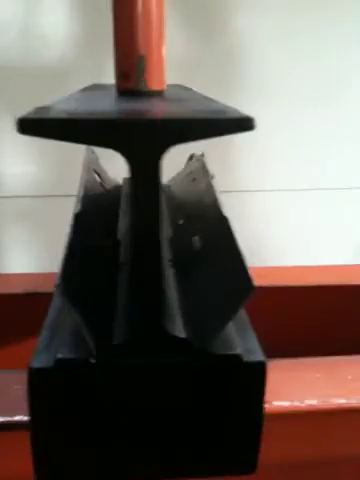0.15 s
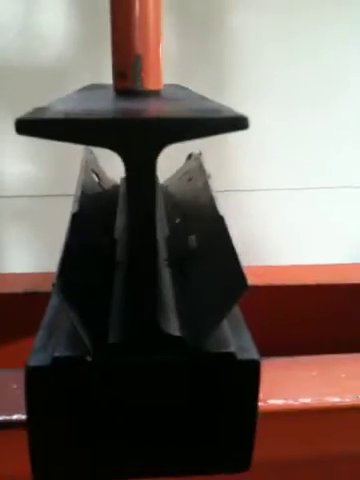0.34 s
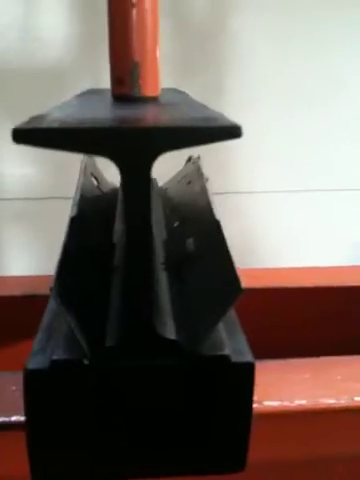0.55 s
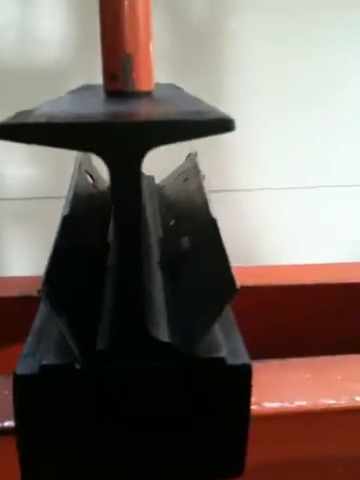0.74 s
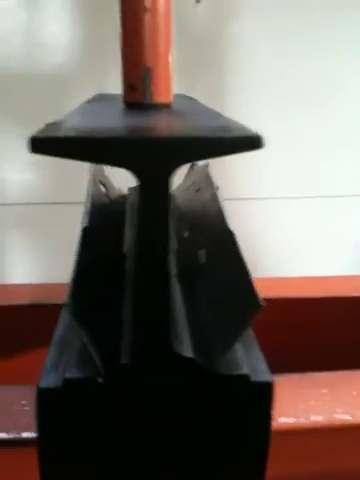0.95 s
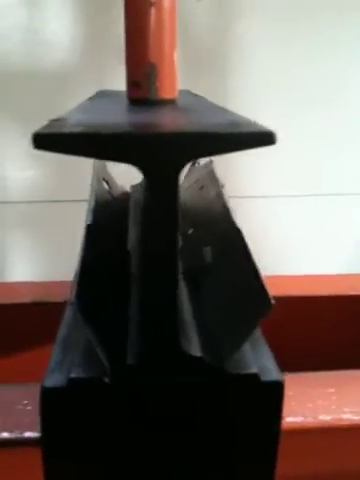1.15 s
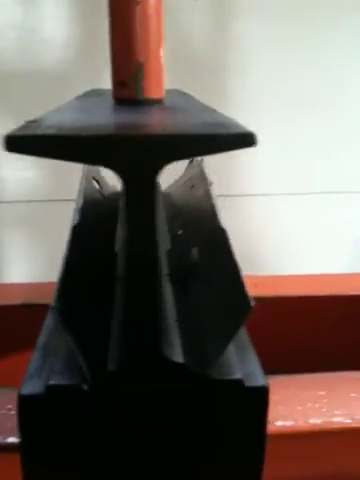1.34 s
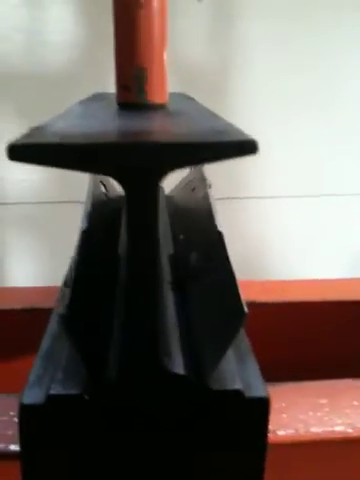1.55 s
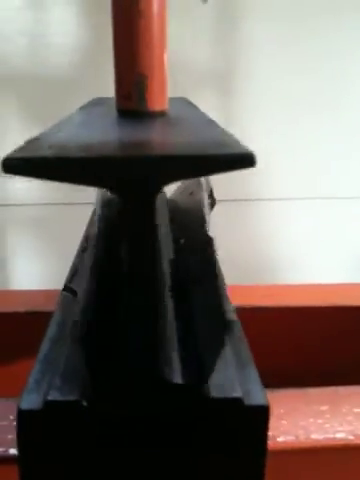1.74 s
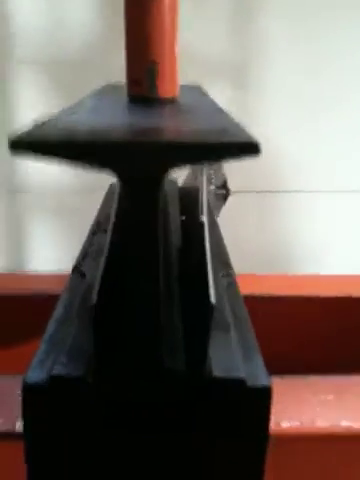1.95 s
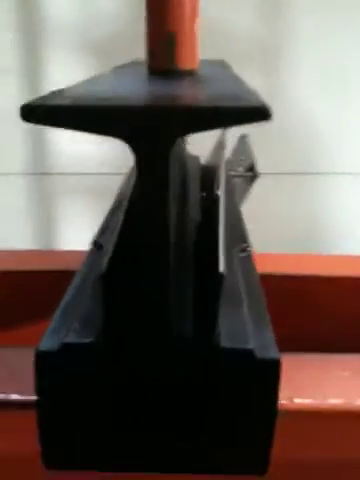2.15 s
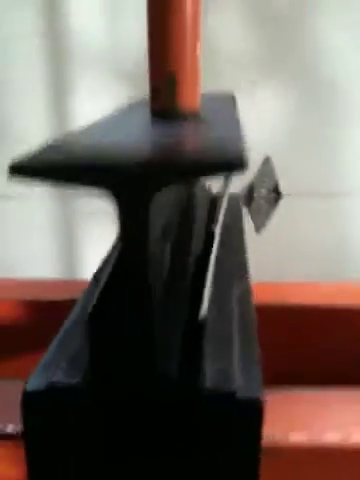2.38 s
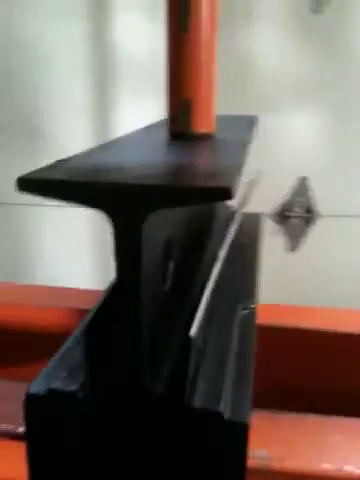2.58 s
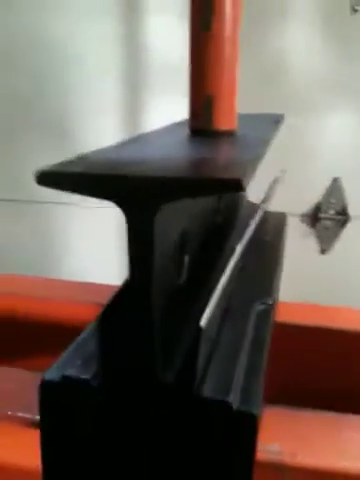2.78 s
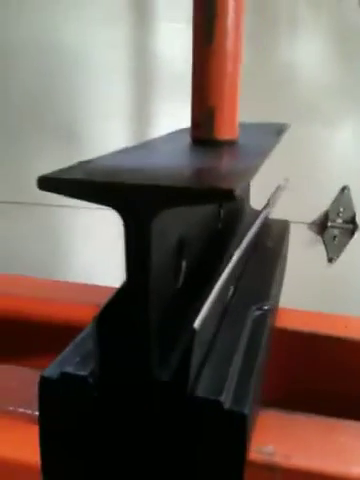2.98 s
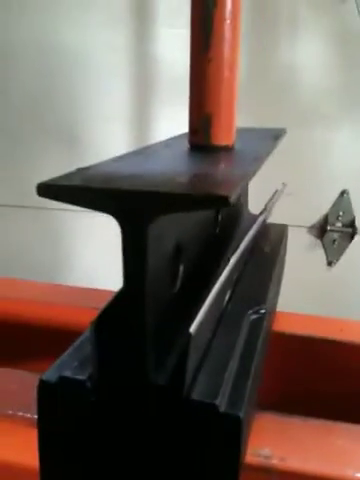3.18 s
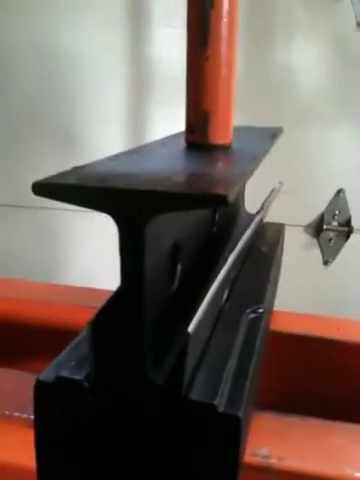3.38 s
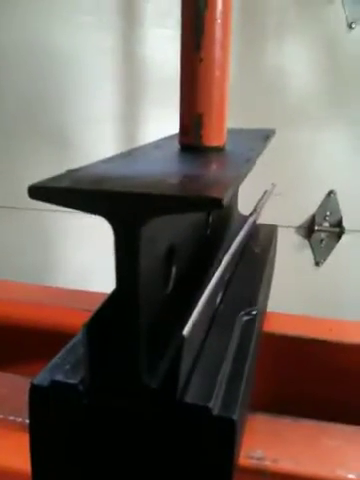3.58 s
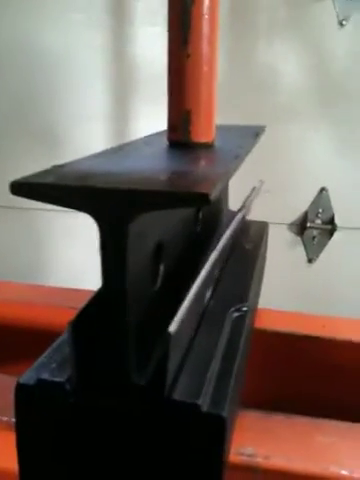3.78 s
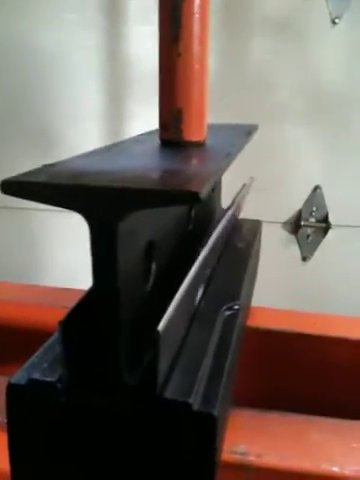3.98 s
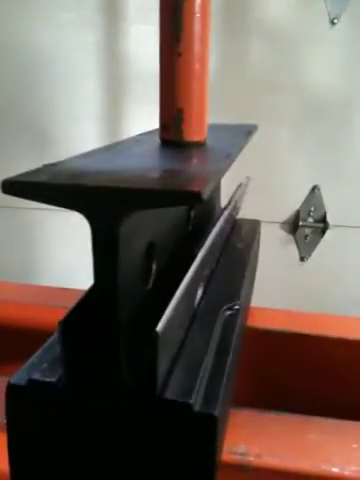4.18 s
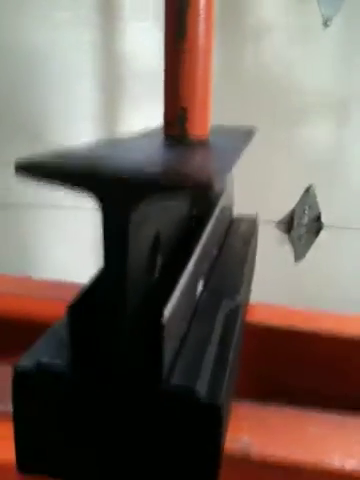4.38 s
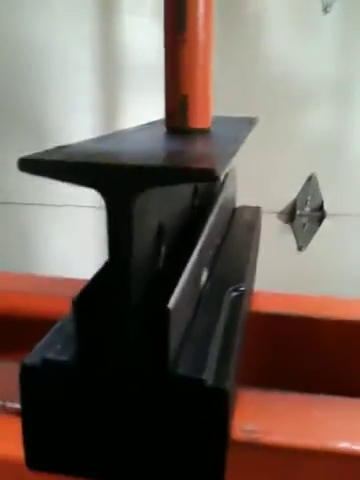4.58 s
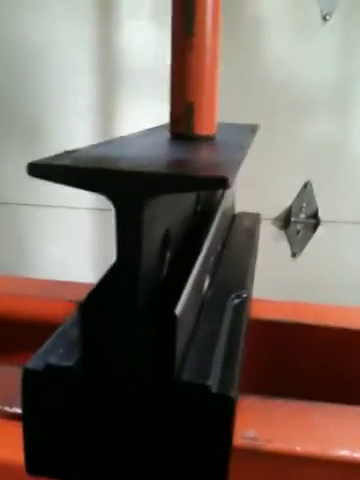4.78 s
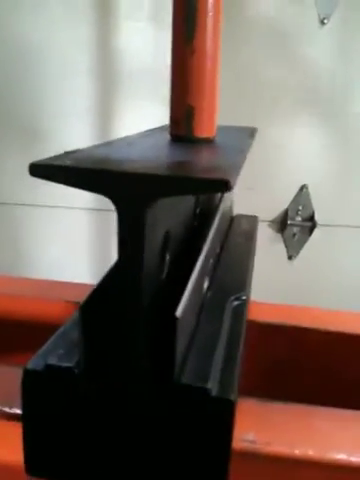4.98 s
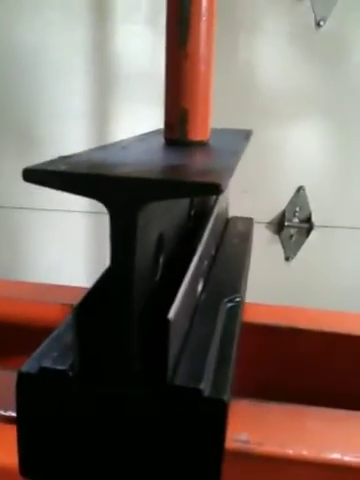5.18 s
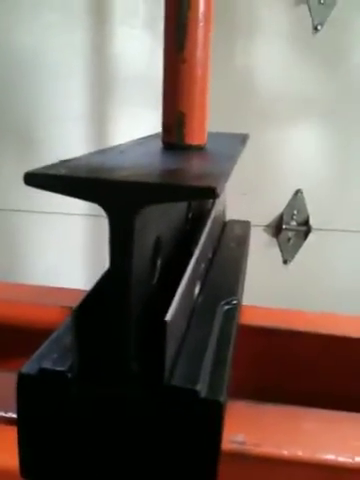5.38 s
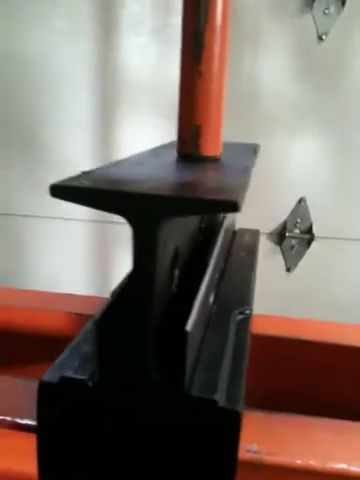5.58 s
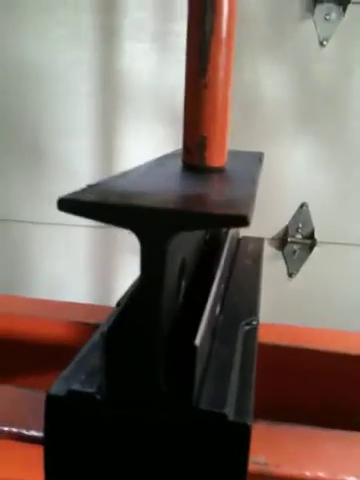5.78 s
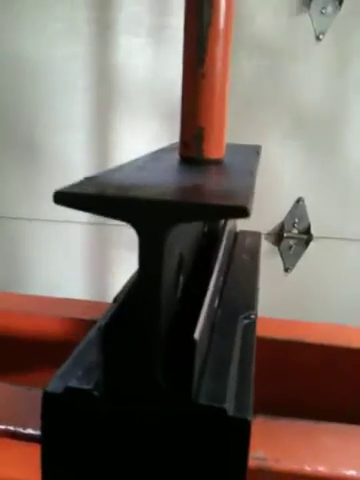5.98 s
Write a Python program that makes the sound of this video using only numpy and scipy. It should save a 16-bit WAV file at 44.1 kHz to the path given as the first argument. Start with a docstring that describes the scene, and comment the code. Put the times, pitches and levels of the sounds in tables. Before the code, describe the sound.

A hydraulic press folds sheet steel with faint metallic creaks and two loud ringing bangs over a low pump hum.

```python
"""Faint, even creaks sound over the low hum of a pump and the soft hiss of a workshop.
A hydraulic press is driving a steel beam into a die (a shaped block), folding a sheet between them.
The sheet sticks and slips with creaks and hollow knocks, and ticks as edges crack and scale flakes off.
Twice it snaps through with a bang that overloads the microphone and leaves the steel ringing."""
import sys
import numpy as np
from scipy import signal
from scipy.fft import rfft, irfft, next_fast_len
from scipy.io import wavfile

SR = 44100
rng = np.random.default_rng(int(sys.argv[2]) if len(sys.argv) > 2 else 0)


def unload_audio(sound):
    """Save the sound as a 16-bit wav file, at the path given as the first command line argument."""
    columns = np.transpose(np.atleast_2d(sound))
    # keep every value between -1 and 1, then stretch to whole-number steps
    steps = np.round(np.clip(columns, -1, 1) * 32767)
    wavfile.write(sys.argv[1], SR, steps.astype(np.int16))


N = 265905
TIME = np.arange(N) / SR
ONE_SECOND = TIME[:SR]

# The pump's hum. Each row: pitch in Hz, average (rms) level in dB.
PUMP_TONES = [(192.3, -64.5), (115, -87), (291, -81)]
# The workshop's rumble and hiss. Each row: frequency in Hz, relative level in dB.
AIR_SPECTRUM = [(30, -39.5), (70, -21), (120, -6), (170, 3), (330, -2), (500, -5.5), (700, -11),
                (1400, -11.5), (2000, -17), (2400, -20.5), (2800, -16.5), (4000, -21.5), (8000, -19),
                (16000, -24)]
# Runs of slips over the die edge. Each row: start and latest time in seconds, first gap in seconds,
# level in dB, loss per slip in dB, change for every second slip in dB, low cut in Hz, brightness in Hz.
# Brightness is the frequency above which a sound is muffled.
SLIP_RUNS = [(-0.040, 1.07, 0.1750, -58.5, 1.5, 7, 730, 1586),
             (4.608, 5.78, 0.1850, -37.5, 1.13, -1, 1440, 2320)]
# The blur of many tones in beam and die, drawn out by the workshop. Each row: frequency in Hz,
# relative level in dB, ring time in seconds. Ring time (t60) is how long a sound takes to fall 60 dB.
PRESS_BLUR = [(60, -40, 0.49), (120, -26.5, .4), (220, -15.5, 0.36), (358, -10.5, 0.67), (575, -12.5, 0.37),
              (760, 0.5, 0.26), (1010, -3.5, .5), (1510, 3.5, 0.37), (2080, -4.5, 0.44), (3370, -1, 0.32),
              (5400, -7.5, 0.34), (8500, -3.5, 0.23), (11100, -10.5, 0.25), (16100, -17.5, 0.16)]
# The die edge where the sheet rubs. Each row: pitch in Hz, relative level in dB, ring time in seconds.
EDGE_TONES = [(913, -5.5, .3), (1090, -8, 0.44), (1290, -17.5, .35), (1520, -11.5, 0.69), (1735, -16, 0.17),
              (1866, -0.5, 0.046), (3070, -6, 0.14), (3700, -47, 0.46)]
# Long tones of the sheet's free wings, clamped differently by each fold. Each row: pitch in Hz,
# then level in dB and ring time in seconds for the first bang, then the same two for the second.
SHEET_TONES = [(286.0, -57, 4.1, -60, 5.2), (310.4, -55, 1.4, -47, 1.3), (355.8, -53, 2.8, -57, 4.6),
               (424.4, -74, 12.0, -55, 5.2), (561.2, -77, 12.0, -68, 7.7), (593.7, -72, 1.9, -34, 1.5),
               (627.3, -72, 5.2, -49, 7.7), (695.0, -60, 3.1, -48, 6.0), (755.5, -63, 12.0, -43, 8.7),
               (797.7, -68, 2.6, -55, 6.0), (875.8, -58, 4.6, -50, 7.2), (934.0, -66, 5.6, -54, 12.0),
               (970.3, -50, 1.2, -33, 2.6), (995.1, -54, 3.8, -50, 8.2), (1043.2, -59, 5.2, -40, 3.6),
               (1071.3, -67, 7.2, -52, 6.3), (1095.2, -48, 2.8, -46, 7.2), (1141.9, -52, 4.3, -34, 4.3),
               (1188.7, -44, 2.3, -28, 2.6), (1227.6, -48, 4.6, -36, 3.0), (1291.0, -39, 3.1, -40, 4.3),
               (1333.7, -37, 2.3, -44, 5.6), (1371.4, -48, 4.1, -31, 2.8), (1422.5, -54, 4.9, -48, 3.1),
               (1446.4, -57, 6.0, -56, 8.2), (1499.9, -52, 4.9, -41, 8.7), (1551.6, -43, 3.6, -34, 2.4),
               (1600.5, -48, 1.9, -50, 4.9), (1649.1, -71, 12.0, -50, 12.0), (1705.8, -62, 4.6, -54, 3.8)]
# The sheet lurches in the die. Each row: start in seconds, creak level in dB, brightness in Hz.
LURCHES = [(0.218, -68.5, 2415), (0.402, -47, 4530), (2.243, -45.5, 8100), (2.276, -51.5, 4400),
           (2.532, -61, 4410), (2.763, -55.5, 5650), (2.851, -55, 4400), (5.566, -45.5, 5750)]
# The hollow of the die. Each row: pitch in Hz, relative level in dB, ring time in seconds.
HOLLOW_TONES = [(640, -9.5, 0.27), (730.7, 3, 0.37), (880, -17, 0.27)]
# Edges crack. Each row: start in seconds, relative peak level in dB, pitch in Hz.
EDGE_CRACKS = [(0.372, -34.5, 2800), (2.148, -39, 6600), (2.198, -35.5, 7060), (2.835, -28, 7560),
               (2.853, -33, 7170), (4.867, -28, 6260), (5.55, -30.5, 6960), (5.581, -20.5, 4300),
               (5.593, -25, 3080)]
# Scale flakes off the bend. Each row: start and end in seconds, typical relative peak level in dB.
FLAKING_SPELLS = [(1.30, 1.54, -62.5), (2.22, 2.351, -46.5), (3.76, 4.018, -49.5), (4.93, 5.055, -41.5)]
# The sheet snaps through and strikes the die. Each row: start in seconds, strength in dB,
# brightness in Hz, thud strength in dB, level of the sheet's weak tones in dB.
SNAPS = [(1.8487, -8, 4567, -4.5, -38.5), (4.3400, 2, 12070, -10.5, -30.5)]
# Short tones of the clamped beam and die. Each row: pitch in Hz, relative level in dB, ring time in seconds.
PRESS_TONES = [(640, -20, .3), (722, -10, .33), (796, -14, .34), (1085, -18, .3), (1153, -15, .5),
               (1237, -14, .58), (1304, -15, .55), (1519, -12, .3), (2114, -9, .34), (2246, -18, .3),
               (2430, -18, .36), (2910, -23, .35), (3311, -20, .35), (3440, -21, .37), (7326, -14, .3),
               (7872, -20, .3), (8776, -20, .28), (8960, -17, .25), (9459, -22, .3), (12945, -24, .18)]
# The settling sheet hits the die again. Each row: start in seconds, strength in dB, brightness in Hz.
REBOUNDS = [(1.876, -19, 7026), (4.361, -16, 5036), (4.396, -9, 7000), (4.432, -38, 5710)]
# Weak tones between the sheet's main ones. Each row: frequency in Hz, relative level in dB
# at the first bang, then at the second.
WEAK_SHEET_SPECTRUM = [(716, -17.5, -4.5), (890, -26.5, -20), (1110, -9, -13), (1380, 3.5, 3),
                       (1420, -7.5, -13.5), (1570, -4, 1.5), (1599, -21.5, -17.5)]


def from_db(db):
    """Turn decibels into a gain to multiply by."""
    return 10 ** (np.asarray(db) / 20)


def unit_rms(x):
    """Scale a sound to an average (rms) level of 1."""
    return x / np.sqrt(np.mean(x ** 2) + 1e-20)


def look_up(table, hz, column=1):
    """Read between the rows of a table, on a musical (log) frequency scale."""
    table = np.array(table)
    return np.interp(np.log(np.maximum(hz, 1)), np.log(table[:, 0]), table[:, column])


def keep_side(x, hz, side, order=2):
    """Keep the "low" or "high" side of hz; a higher order cuts more steeply."""
    return signal.sosfilt(signal.butter(order, min(hz, .45 * SR), side, fs=SR, output="sos"), x)


def fade(t, t60):
    """Die away, 60 dB down after t60 seconds."""
    return np.exp(-np.log(1000) * t / t60)


def tone(hz, t60):
    """One second of a dying tone: one way the steel can vibrate."""
    return np.sin(2 * np.pi * hz * ONE_SECOND + rng.uniform(0, 2 * np.pi)) * fade(ONE_SECOND, t60)


def ring(table):
    """All the tones of a struck part, sounding together."""
    return sum(from_db(db) * tone(hz, t60) for hz, db, t60 in table)


def add(out, start_s, sound):
    """Mix a sound in at its start time."""
    first = round(start_s * SR)
    heard = sound[max(-first, 0):N - first]
    out[max(first, 0):max(first, 0) + len(heard)] += heard


def pump():
    """The pump hums, low and steady."""
    return sum(np.sqrt(2) * from_db(db) * np.sin(2 * np.pi * hz * TIME) for hz, db in PUMP_TONES)


def workshop_air(level_db=-67.5):
    """The workshop rumbles and hisses softly."""
    size = next_fast_len(N)
    colour = from_db(look_up(AIR_SPECTRUM, np.fft.rfftfreq(size, 1 / SR)))
    noise = irfft(rfft(rng.standard_normal(size)) * colour, size)[:N]
    return from_db(level_db) * unit_rms(noise)


def slip_beat(max_slips=8, gap_shrink=0.013, slip_s=0.0095):
    """Pushed steadily, the sheet sticks and slips in a beat that fades as it gives; list the creaks."""
    rows = []
    for start, end, gap, db, loss_db, accent_db, low_hz, bright_hz in SLIP_RUNS:
        for k in range(max_slips):
            if start < end:
                rows.append((start, db - loss_db * k + accent_db * (k % 2), low_hz, bright_hz, slip_s))
            start += gap * (1 - gap_shrink) ** k
    return rows


def press_blur():
    """Countless tones of beam and die blur into bands of noise, each dying at its own pace."""
    hz = np.fft.rfftfreq(SR, 1 / SR)
    spectrum = from_db(look_up(PRESS_BLUR, hz)) * np.exp(2j * np.pi * rng.random(len(hz)))
    edges_hz = np.geomspace(70, 17000, 20)
    blur = np.zeros(SR)
    for low, high in zip(edges_hz, edges_hz[1:]):
        band = irfft(spectrum * (hz >= low) * (hz < high))
        t60 = look_up(PRESS_BLUR, np.sqrt(low * high), column=2)
        blur += band * fade(ONE_SECOND, t60)
    return blur / np.std(irfft(spectrum))


def creaks(slips_per_s=1500, damping_t60=3.1, lurch_low_hz=520, lurch_s=0.0074):
    """Each creak is a dying burst of tiny slips that shakes the press and rings the die edge."""
    out, t = np.zeros(N), TIME[:SR // 10]
    bodies = [press_blur() * fade(ONE_SECOND, damping_t60) + ring(EDGE_TONES) for _ in range(2)]
    lurches = [(start, db, lurch_low_hz, bright_hz, lurch_s) for start, db, bright_hz in LURCHES]
    for k, (start, db, low_hz, bright_hz, decay_s) in enumerate(lurches + slip_beat()):
        slipping = rng.random(len(t)) < slips_per_s / SR
        slips = slipping * rng.standard_normal(len(t)) * np.exp(-t / decay_s)
        slips[0] += 1   # the contact breaks loose
        shaken = signal.fftconvolve(slips, bodies[k % 2][:SR // 2])
        creak = keep_side(keep_side(shaken, low_hz, "high"), bright_hz, "low", order=3)
        add(out, start, from_db(db) * creak / np.std(creak[:SR // 25]))   # level of the first 40 ms
    return out


def strain_ring(creaking, gain_db=-22, t60=1.5):
    """The creaks keep the sheet's strongest tones ringing faintly."""
    tones = sum(tone(hz, t60) for hz, db, *_ in SHEET_TONES if db > -45)
    return from_db(gain_db) * signal.fftconvolve(creaking, tones / np.linalg.norm(tones))[:N]


def hollow_knocks(rise_s=0.00061, boost_db=3.5, db_per_octave=-6.5, reference_hz=4500):
    """Each lurch is a soft blow on the hollow die; the duller its creak, the more goes into the knock."""
    out = np.zeros(N)
    attack = 1 - np.exp(-ONE_SECOND / rise_s)
    for start, db, bright_hz in LURCHES:
        knock_db = db + boost_db + db_per_octave * np.log2(bright_hz / reference_hz)
        add(out, start, from_db(knock_db) * ring(HOLLOW_TONES) * attack)
    return out


def ticks(crack_t60=0.017, ping_width_hz=700, ping_db=9, room_db=-1.5, room_t60=0.3, gain_db=-1):
    """Each brief crack pings a small, stiff patch of steel and echoes in the workshop."""
    out, t = np.zeros(N), TIME[:SR // 10]
    for start, db, hz in EDGE_CRACKS + flakes():
        crack = keep_side(rng.standard_normal(len(t)) * fade(t, crack_t60), 2000, "high")
        ping = signal.lfilter(*signal.iirpeak(hz, hz / ping_width_hz, fs=SR), crack)
        tick = keep_side(crack + from_db(ping_db) * ping, 6600, "low")
        add(out, start, from_db(db + gain_db) * tick / np.abs(tick).max())
    echoes = keep_side(rng.standard_normal(SR) * fade(ONE_SECOND, room_t60), 13700, "low")
    return out + from_db(room_db) * signal.fftconvolve(out, echoes / np.linalg.norm(echoes))[:N]


def flakes(per_spell=4, pitch_hz=8500, spread_octaves=0.063, spread_db=4):
    """Scale, the crust on the steel, flakes off the bend; list its faint, scattered ticks."""
    rows = []
    for start, end, db in FLAKING_SPELLS:
        for k in range(per_spell):
            when = start + (end - start) * (k + rng.random()) / per_spell
            flake_db = db + spread_db * rng.normal()
            hz = pitch_hz * 2 ** (spread_octaves * rng.normal())
            rows.append((when, flake_db, hz))
    return rows


def press_blow(bright_hz, tones_db=-0.5):
    """Struck once, beam and die give a few clear tones over the blur."""
    struck = press_blur() + from_db(tones_db) * ring(PRESS_TONES)
    return keep_side(struck, bright_hz, "low", order=1)


def bangs(rise_s=.0015, thud_t60=0.12, boom_hz=716, boom_db=-5, boom_t60=.19):
    """Each snap slams the press, with a heavy thud and a boom of the die; lighter hits follow."""
    out = np.zeros(N)
    attack = 1 - np.exp(-ONE_SECOND / rise_s)
    for start, db, bright_hz, thud_db, _ in SNAPS:
        noise = keep_side(rng.standard_normal(SR), 600, "high")
        thud = keep_side(noise, 1500, "low", order=3) * fade(ONE_SECOND, thud_t60)
        thud /= np.std(thud[:SR // 100])
        boom = from_db(boom_db) * tone(boom_hz, boom_t60)
        bang = from_db(db) * press_blow(bright_hz) + from_db(thud_db) * (thud + boom)
        add(out, start, attack * bang)
    for start, db, bright_hz in REBOUNDS:
        add(out, start, from_db(db) * attack * press_blow(bright_hz))
    return out


def sheet_ring(split_hz=2.9, twin_db=-11, weak_count=28, weak_t60=3):
    """The sheet rings for seconds; its two nearly equal wings make each main tone waver."""
    out = np.zeros(N)
    twin_gain = from_db(twin_db)
    for k, (start, *_, weak_db) in enumerate(SNAPS):
        t = TIME[:N - round(start * SR)]
        sine = lambda hz: np.sin(2 * np.pi * hz * t + rng.uniform(0, 2 * np.pi))
        for hz, *folds in SHEET_TONES:
            db, t60 = folds[2 * k:2 * k + 2]
            wing = sine(hz)
            twin = twin_gain * sine(hz + split_hz * rng.uniform(-0.51, 1))
            pair = (wing + twin) / np.hypot(1, twin_gain)
            add(out, start, from_db(db) * pair * fade(t, t60))
        weak_hz = np.linspace(700, 1650, weak_count) + rng.uniform(-17, 17, weak_count)
        weak = sum(from_db(look_up(WEAK_SHEET_SPECTRUM, hz, column=k + 1)) * sine(hz) for hz in weak_hz)
        add(out, start, from_db(weak_db) * unit_rms(weak) * fade(t, weak_t60))
    return out


def shimmer(lowest_hz=1850, gain_db=-41, t60=1.17, damping=0.37, db_per_octave=-3.0, count=70):
    """Thin, high tones of the sheet outlast each bang; the higher, the weaker and shorter."""
    out = np.zeros(N)
    for start, db, *_ in SNAPS:
        octaves = rng.uniform(0, 2.5, count)
        gains = from_db(db + gain_db + db_per_octave * octaves)
        tones = sum(gain * tone(lowest_hz * ratio, t60 / ratio ** damping)
                    for gain, ratio in zip(gains, 2 ** octaves))
        add(out, start, tones * (1 - ONE_SECOND ** 8))   # silent after one second
    return out


def scene():
    """Press, sheet and workshop, mixed at one microphone."""
    creaking = creaks()
    snaps = bangs() + sheet_ring() + shimmer()
    mix = snaps + creaking + strain_ring(creaking) + hollow_knocks() + ticks() + pump() + workshop_air()
    return mix[None]


def record(dry, soft_limit=.72, hard_limit=.77, low_cut_hz=75, top_hz=16100):
    """The bangs overload the microphone and are clipped; deep bass and the highest treble are cut."""
    treble_cut = signal.ellip(10, .1, 80, top_hz, fs=SR, output="sos")
    overloaded = soft_limit * np.tanh(dry / soft_limit)
    filtered = signal.sosfilt(treble_cut, keep_side(overloaded, low_cut_hz, "high", order=1))
    return signal.sosfiltfilt(treble_cut, np.clip(filtered, -hard_limit, hard_limit))


dry = scene()
out = record(dry)
unload_audio(out)
```